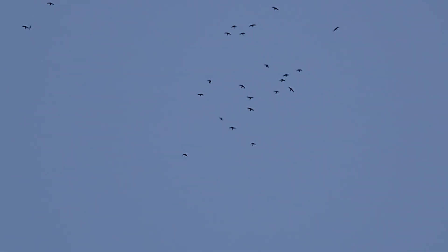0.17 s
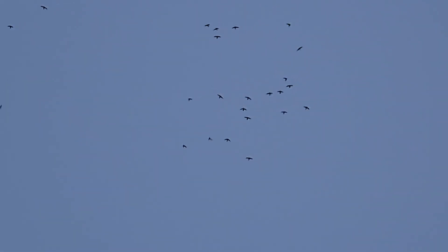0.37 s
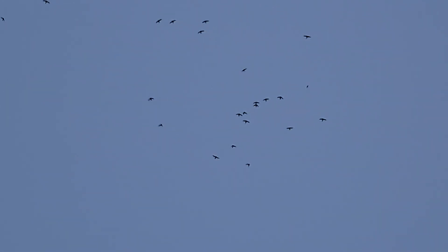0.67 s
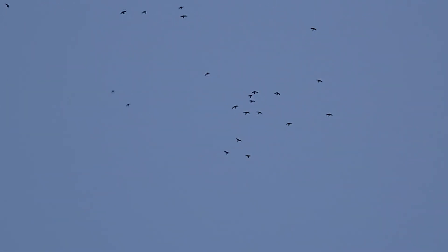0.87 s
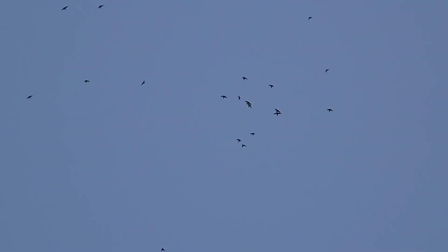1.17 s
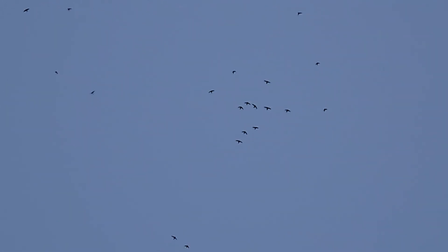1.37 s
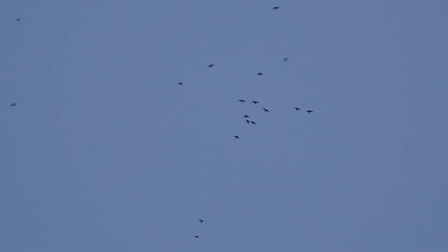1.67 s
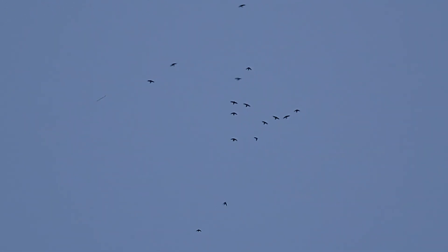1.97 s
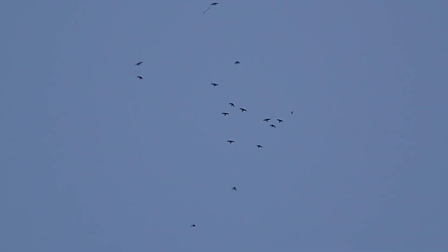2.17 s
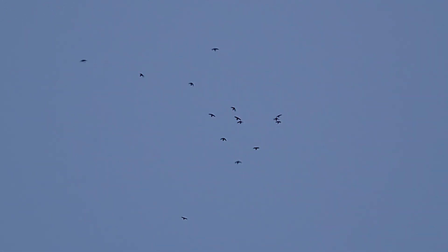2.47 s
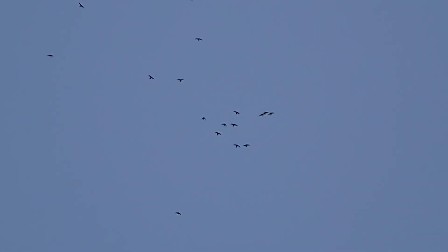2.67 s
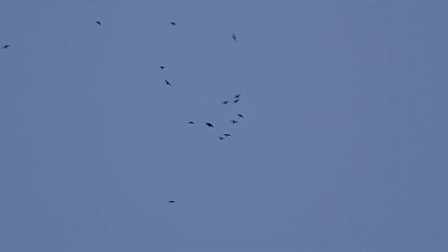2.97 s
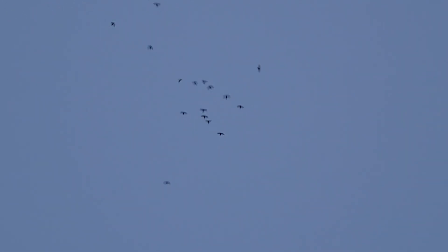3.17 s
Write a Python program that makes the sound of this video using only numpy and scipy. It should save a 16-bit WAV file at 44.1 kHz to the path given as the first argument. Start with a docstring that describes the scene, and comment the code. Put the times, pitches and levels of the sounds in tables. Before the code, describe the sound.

A shrill cicada drone fills an open outdoor space, one close singer cutting out suddenly while others carry on; a vehicle recedes far off, with faint chirps and low hoots, captured by a stationary stereo microphone.

```python
"""Cicadas and distant traffic

Cicadas buzz in trees; the nearest stops short and the chorus carries on.
Each song is a fast train of tymbal clicks, rung by the insect's body and scattered by foliage.
Birds chirp and far calls hoot (gliding sines); dry ticks are short noise bursts.
Shaped noise makes distant traffic rumble while one vehicle's engine and tyre hiss recede."""
import sys
import numpy as np
from scipy import signal
from scipy.fft import rfft, irfft
from scipy.io import wavfile
from scipy.ndimage import uniform_filter1d

SR = 44100
rng = np.random.default_rng(int(sys.argv[2]) if len(sys.argv) > 2 else 0)


def store_wav(level_fs):
    """Save 16-bit WAV to argv[1]."""
    pcm = np.round(np.clip(np.atleast_2d(level_fs), -1, 1) * 32767)
    wavfile.write(sys.argv[1], SR, pcm.T.astype(np.int16))


N = 146853
T = np.arange(N) / SR  # time [s]

# Spectra are relative: each coloured sound is scaled to rms 1 before its level is set.
# Nearest cicada's effort: (time [s], level [dB])
NEAR_LEVEL = [(0, -30), (.19, -28.3), (.27, -32), (.42, -31), (.59, -32), (.645, -32), (.7, -33.5),
              (.76, -29), (1.2, -29), (1.47, -27), (1.555, -31), (1.62, -28), (1.86, -26.5)]
# Nearest cicada's body resonances: (frequency [Hz], gain [dB])
NEAR_BODY = [(3000, -60), (4300, -41), (4700, -23.5), (4930, -17), (5100, -9.5), (5340, -2), (5650, 1),
             (5800, 1), (5880, -8), (6100, -19)]
# Nearest cicada's overtones: (frequency [Hz], gain [dB])
NEAR_TREBLE = [(6700, -18), (7400, -55), (9500, -39.5), (11800, -38), (14000, -50), (16000, -39)]
# Middle cicada's body resonances: (frequency [Hz], gain [dB])
MIDDLE_BODY = [(3500, -73), (4600, -50), (5000, -8), (5300, -5), (5700, 3.5), (5850, 2), (6100, -15),
               (6800, -11.5), (7500, -37), (11500, -43), (16000, -56)]
# High cicada's body resonances: (frequency [Hz], gain [dB])
HIGH_BODY = [(4500, -44), (5800, 32), (6200, -14), (6380, 2), (6520, -28.5), (6680, 5.5), (6900, -16),
             (7400, -49), (12500, -46), (16000, -76)]
# High cicada's clean overtones: (frequency [Hz], level [dB])
WHINE = [(6283, -54.5), (6347, -47.5), (6407, -50), (6468, -55), (6664, -56.5), (6724, -58), (6788, -60)]
# Far chorus's body resonances before the near song stops: (frequency [Hz], gain [dB])
CHORUS_EARLY = [(3500, -30.5), (4500, -20), (4930, -5.5), (5400, 4), (5750, -5), (6100, -1.5), (6650, -3.5),
                (6900, -18), (7400, -28), (7800, -32.5), (9000, -55), (12000, -29), (14000, -38),
                (16000, -33)]
# Far chorus's body resonances after the stop: (frequency [Hz], gain [dB])
CHORUS_LATE = [(3500, -34.5), (4500, -20.5), (4900, -14.5), (5400, 3.5), (5750, 0.5), (6100, 1.5),
               (6700, 2.5), (7000, -10.5), (7400, -22), (7800, -19.5), (9500, -41.5), (11800, -31),
               (14000, -41), (16000, -35)]
# Far chorus: (time [s], level [dB])
CHORUS_LEVEL = [(0, -33), (1.3, -34), (1.8, -34.5), (1.96, -35), (2.2, -34), (2.7, -33.5), (3.33, -33)]
# Deepest part of the rumble: (frequency [Hz], density [dB per Hz])
BOOM = [(15, -32), (35, -19.5), (58, -6), (73, -2), (95, -14), (125, -21), (300, -56)]
# Deep rumble: (time [s], level [dB])
BOOM_LEVEL = [(0.0, -38.5), (0.43, -42.5), (1.06, -41), (1.15, -48), (1.19, -40), (1.59, -40), (1.84, -47),
              (1.87, -39), (1.93, -49.5), (2.03, -39), (2.21, -46), (2.39, -40.5), (2.76, -50), (2.85, -37),
              (2.88, -44), (3.33, -40)]
# Distant traffic: (frequency [Hz], density [dB per Hz])
RUMBLE = [(15, -38), (70, -23), (115, -8.5), (145, -14), (185, -12.5), (230, -19), (370, -19.5), (700, -24),
          (1100, -29), (2000, -34), (3500, -37), (8000, -47), (16000, -58)]
# Distant traffic: (time [s], level [dB])
RUMBLE_LEVEL = [(0, -41.5), (.4, -45), (1.5, -48.5), (1.85, -46.5), (2.03, -48), (2.7, -45.5), (3.33, -46)]
# Vehicle's engine: (frequency [Hz], density [dB per Hz])
ENGINE = [(30, -30), (85, -16), (120, 1), (150, -2.5), (185, 4.5), (240, -19), (380, -13.5), (500, -40),
          (1500, -48)]
# Vehicle's engine: (time [s], level [dB])
ENGINE_LEVEL = [(0, -45), (.2, -41), (.45, -47), (.65, -48.5), (1, -47), (1.25, -47.5), (1.5, -44.5),
                (1.75, -52.5), (2.1, -60), (3.33, -62)]
# Receding vehicle's hiss: (frequency [Hz], density [dB per Hz])
TYRES = [(100, -6), (280, 0.5), (600, -4.5), (800, 2.5), (1000, -4.5), (1200, -1), (1600, -4.5),
         (2050, -2.5), (2400, -10.5), (3100, -8), (4500, -12.5), (8000, -23)]
# Receding vehicle's hiss: (time [s], level [dB])
TYRES_LEVEL = [(0, -46.5), (.3, -52), (.48, -47.5), (.65, -49), (1, -51.5), (1.7, -54.5), (2.1, -58),
               (3.33, -69)]
# Left-right likeness of outdoor noise, clipped to +-1: (frequency [Hz], correlation [-])
LIKENESS = [(20, 0.82), (130, 0.98), (250, 0.91), (500, 0.63), (1000, -0.26), (2000, 0.092), (4000, 0.3),
            (16000, -1.1)]
# Far hoots: (start [s], length [s], pitch [Hz], pitch change [share], level [dB])
HOOTS = [(.01, 0.11, 2030, -.08, -59), (.03, 0.11, 1023, -.06, -57), (.44, 0.079, 2060, .05, -54),
         (.445, 0.087, 975, -.05, -59), (.7, 0.11, 760, .04, -53), (.77, 0.16, 1800, -.04, -61),
         (1.38, 0.13, 1259, .05, -57.5), (1.63, 0.13, 1316, .04, -54.5), (1.63, .15, 1079, .05, -59),
         (1.8, 0.1, 1290, -.04, -59.5), (3.025, .07, 529, .04, -53.5), (3.11, .16, 537, .08, -48.5)]
# Faint dry ticks close by: (time [s], level [dB])
TICKS = [(.021, -56), (1.769, -50)]
# Bird chirps: (start [s], length [s], pitch [Hz], pitch change [share], level [dB])
CHIRPS = [(.135, .03, 2720, -.02, -61), (.15, 0.033, 2400, .02, -57), (.176, .055, 2560, -.02, -55.5),
          (.44, 0.074, 3130, 0.029, -59), (.893, 0.031, 4200, -.01, -60), (.94, 0.086, 4140, -.02, -65),
          (1.373, 0.021, 4870, -.01, -39), (1.413, 0.036, 4620, -0.023, -45),
          (1.405, 0.046, 2700, -0.027, -62), (1.455, .07, 3460, -0.11, -62), (1.56, 0.078, 3000, -.07, -63),
          (1.66, 0.12, 3830, -0.044, -62), (1.84, 0.046, 3190, -.01, -60), (2.115, 0.064, 3000, -.01, -62),
          (2.649, .01, 4600, -.2, -46), (2.697, .021, 4884, -.005, -39), (2.71, 0.012, 4680, -0.037, -46),
          (2.749, 0.049, 4720, 0.031, -45), (2.802, .022, 4715, 0.052, -50),
          (2.829, .03, 4680, -0.028, -54), (2.845, .04, 3410, -.01, -64), (2.9, 0.058, 3300, -.02, -67)]

RIBS = 7  # clicks in one pull of the tymbal
NEAR_CLICK_HZ, MIDDLE_CLICK_HZ, HIGH_CLICK_HZ = 463, 432, 444.2
STOP_S, STOP_DB_PER_S = 1.882, 380
TICK_T60_S = .008
BAND_EDGE_HZ, FADE_S = 15750, .004


def amp(db):
    """Decibels to gain."""
    return 10 ** (np.asarray(db) / 20)


def evened(x):
    """Scales to rms 1."""
    return x / np.sqrt(np.mean(x ** 2) + 1e-20)


def level(points):
    """Gain over time from (time [s], level [dB]) points."""
    return amp(np.interp(T, *np.transpose(points)))


def read(points):
    """A (frequency [Hz], value) table at every bin, interpolated over log frequency."""
    hz, value = np.transpose(points)
    bins_hz = np.fft.rfftfreq(N, 1 / SR)
    return np.interp(np.log(bins_hz + 1), np.log(hz + 1), value)


def colour(x, points):
    """Filters x by a spectrum, then scales to rms 1."""
    return evened(irfft(rfft(x) * amp(read(points)), N))


def drift(rate_hz):
    """Smooth random motion up to a rate, rms 1."""
    lowpass = np.exp(-(np.fft.rfftfreq(N, 1 / SR) / rate_hz) ** 2)
    return evened(irfft(rfft(rng.standard_normal(N)) * lowpass, N))


def pan(left_db):
    """Channel gains for a left-right level difference."""
    return amp(np.array([[left_db], [-left_db]]) / 2)


def foliage(x, t60_s, wet, lag_samples=0):
    """Direct sound, lag_samples later on the right, plus a scattered tail for each side."""
    t = np.arange(SR // 2) / SR
    tail = rng.standard_normal((2, len(t))) * amp(-60 * t / t60_s)
    wet = np.clip(wet, 0, 1)  # tail's share of energy
    response = np.sqrt(wet) * tail / np.linalg.norm(tail, axis=1, keepdims=True)
    onsets = [max(-lag_samples, 0), max(lag_samples, 0)]
    response[[0, 1], onsets] += np.sqrt(1 - wet)
    return signal.fftconvolve(x[None], response, axes=1)[:, :N]


def tymbal(click_hz, wander_share, jitter_clicks, uneven_db):
    """Ribs buckle one after another, each with its own strength, pull after pull."""
    rate_hz = click_hz * (1 + wander_share * drift(4))
    turns = np.cumsum(rate_hz) / SR + jitter_clicks * drift(200)
    at = np.flatnonzero(np.diff(np.floor(turns)) > 0)
    count = np.floor(turns[at + 1])
    late = (count - turns[at]) / (turns[at + 1] - turns[at])
    rib = count % RIBS / RIBS
    size = amp(uneven_db * (np.sin(np.pi * rib) + rng.standard_normal(N)[at] / 2))
    clicks = np.zeros(N)
    # split between two samples for timing finer than a sample
    clicks[at], clicks[at + 1] = size * (1 - late), size * late
    return clicks


def near_cicada():
    """The loudest singer: body-rung clicks throb a little, then stop short."""
    clicks = tymbal(NEAR_CLICK_HZ, wander_share=.01, jitter_clicks=.075, uneven_db=4.0)
    scattered = foliage(clicks, t60_s=0.15, wet=0.58, lag_samples=15)
    song = colour(scattered, NEAR_BODY + NEAR_TREBLE)
    stop = amp(-STOP_DB_PER_S * np.maximum(T - STOP_S, 0))
    throb = amp(0.78 * drift(25))
    return song * level(NEAR_LEVEL) * stop * throb * pan(left_db=-1.0)


def middle_cicada():
    """A steady singer further off: body-rung clicks, mostly scattered."""
    clicks = tymbal(MIDDLE_CLICK_HZ, wander_share=.005, jitter_clicks=.04, uneven_db=6)
    song = colour(foliage(clicks, t60_s=0.39, wet=0.9, lag_samples=-20), MIDDLE_BODY)
    return amp(-34.5) * song * pan(left_db=1.6)


def high_cicada():
    """A higher singer, regular enough to whine: clicks plus sine overtones wavering together."""
    clicks = tymbal(HIGH_CLICK_HZ, wander_share=.0008, jitter_clicks=.03, uneven_db=9)
    song = colour(foliage(clicks, t60_s=.2, wet=0.83, lag_samples=15), HIGH_BODY)
    waver = 1 + 0.00082 * drift(5.6)
    whine = np.zeros(N)
    for hz, db in WHINE:
        gain = amp(db + 2 * drift(4.9))
        turns = np.cumsum(hz * waver) / SR + rng.random()
        whine += gain * np.sqrt(2) * np.sin(2 * np.pi * turns)
    return (amp(-47.0) * song + whine) * pan(left_db=2.0)


def chorus():
    """Six far click trains merge; their spectrum crossfades as the near one stops."""
    voices = np.zeros((2, N))
    for _ in range(6):
        # click rates held closely enough to leave thin strands
        clicks = tymbal(rng.uniform(360, 480), wander_share=.0015, jitter_clicks=.011, uneven_db=6.5)
        voices += foliage(clicks, t60_s=0.31, wet=0.82, lag_samples=rng.integers(-20, 21))
    late = np.clip((T - STOP_S) / 0.09 + .5, 0, 1)
    song = (1 - late) * colour(voices, CHORUS_EARLY) + late * colour(voices, CHORUS_LATE)
    return song * level(CHORUS_LEVEL) * amp(.5 * drift(12)) * pan(left_db=4.0)


def air(spectrum):
    """Diffuse outdoor noise, nearly mono in the bass."""
    a, b = rng.standard_normal((2, N))
    same = np.clip(read(LIKENESS), -1, 1)
    right = irfft(same * rfft(a) + np.sqrt(1 - same ** 2) * rfft(b), N)
    return colour(np.array([a, right]), spectrum)


def patchy(x, depth_db, width_hz, length_s):
    """Moving air lets far sound swell and fade in patches of time and pitch."""
    hz, t, z = signal.stft(x, SR, nperseg=1024, noverlap=768)
    field = rng.standard_normal((len(t), len(hz))).T
    for axis, spread in enumerate([width_hz / hz[1], length_s / t[1]]):
        bell = np.exp(-(np.arange(-40, 41) / spread) ** 2)
        field = signal.fftconvolve(field, np.expand_dims(bell, 1 - axis), "same", axes=axis)
    swollen = z * amp(depth_db * evened(field))
    return evened(signal.istft(swollen, SR, nperseg=1024, noverlap=768)[1][:, :N])


def steadied(x, rate_hz):
    """Evens out swells slower than a rate, dividing by a moving rms."""
    power = uniform_filter1d((x ** 2).mean(0), int(SR / rate_hz))
    return x / np.sqrt(abs(power) + 1e-9)


def distant_traffic():
    """Far rumble as patchy low noise, with a deep, heaving boom."""
    boom = steadied(air(BOOM), rate_hz=12.4) * level(BOOM_LEVEL)
    rumble = patchy(air(RUMBLE), depth_db=2.5, width_hz=47, length_s=0.038) * level(RUMBLE_LEVEL)
    return (boom + rumble) * pan(left_db=-0.66)


def receding_vehicle():
    """One vehicle moving away: steadied low engine noise and patchy tyre hiss."""
    engine = steadied(air(ENGINE), rate_hz=5.6) * level(ENGINE_LEVEL)
    tyres = patchy(air(TYRES), depth_db=4.5, width_hz=55, length_s=0.03)
    return engine * pan(left_db=-0.66) + tyres * level(TYRES_LEVEL) * amp(1.1 * drift(7.1))


def calls(rows, rise_s, fade_db, rough_share):
    """Gliding, fluttering whistles that rise quickly and tail off; positive fade_db weakens them."""
    out, shake, flutter = np.zeros(N), drift(445), amp(2.5 * drift(66))
    for start_s, length_s, hz, glide, db in rows:
        u = np.clip((T - start_s) / length_s, 0, 1)
        pitch_hz = hz * (1 + glide * (u - .5) + rough_share * shake)
        rise = np.minimum(u * length_s / rise_s, 1)
        envelope = rise * np.sqrt(1 - u ** 4) * amp(db - fade_db * (u - .5))
        out += envelope * np.sqrt(2) * np.sin(2 * np.pi * np.cumsum(pitch_hz) / SR)
    return out * flutter


def hoots():
    """Far low calls: rough whistles that strengthen before tailing off, in a long scattered tail."""
    return foliage(calls(HOOTS, rise_s=0.012, fade_db=-6, rough_share=0.034), t60_s=0.74, wet=0.57)


def ticks():
    """Tiny, bright noise snaps that die at once."""
    snap = colour(rng.standard_normal(N), [(3000, -30), (11000, 0)])  # (frequency [Hz], gain [dB])
    return snap * sum((T > start_s) * amp(db - 60 * abs(T - start_s) / TICK_T60_S)
                      for start_s, db in TICKS)


def chirps():
    """Faint birds: quick whistles that weaken, with a short scattered tail."""
    return foliage(calls(CHIRPS, rise_s=0.0031, fade_db=7, rough_share=0.0079), t60_s=0.08, wet=0.32)


def scene():
    """Cicadas in front, birds and traffic far behind."""
    cicadas = near_cicada() + middle_cicada() + high_cicada() + chorus()
    vehicles = distant_traffic() + receding_vehicle()
    return cicadas + vehicles + hoots() + ticks() + chirps()


def record(dry):
    """Low-pass band limit, with click-free ends."""
    ends = np.minimum(np.minimum(T, T[::-1]) / FADE_S, 1)
    lowpass = signal.firwin(511, BAND_EDGE_HZ, window=("kaiser", 9), fs=SR)
    return signal.oaconvolve(dry * ends, lowpass[None], "same")


dry = scene()
out = record(dry)
store_wav(out)
```